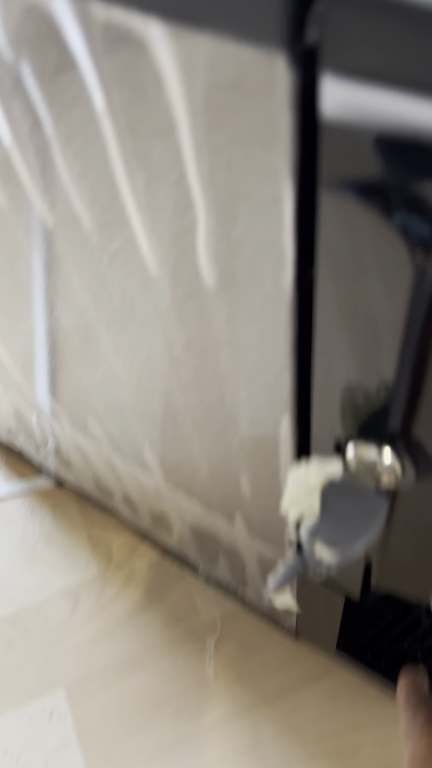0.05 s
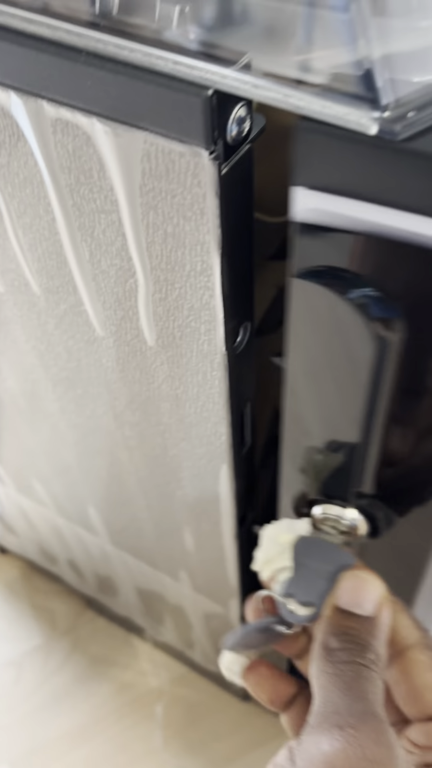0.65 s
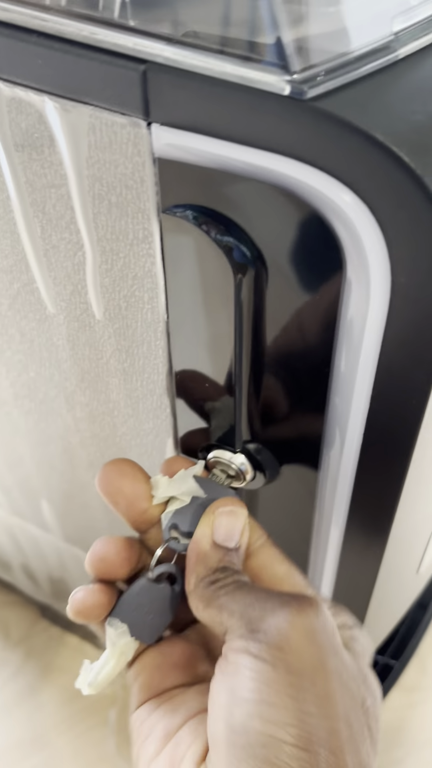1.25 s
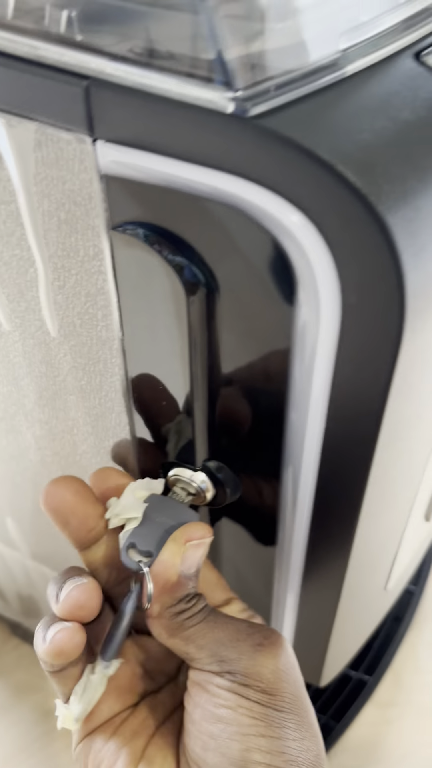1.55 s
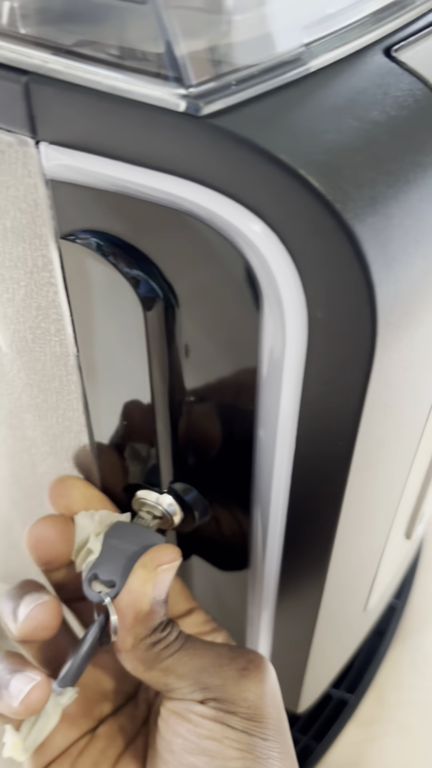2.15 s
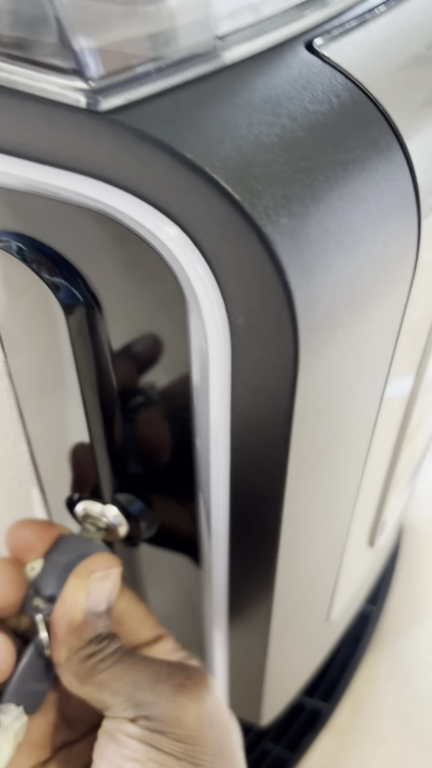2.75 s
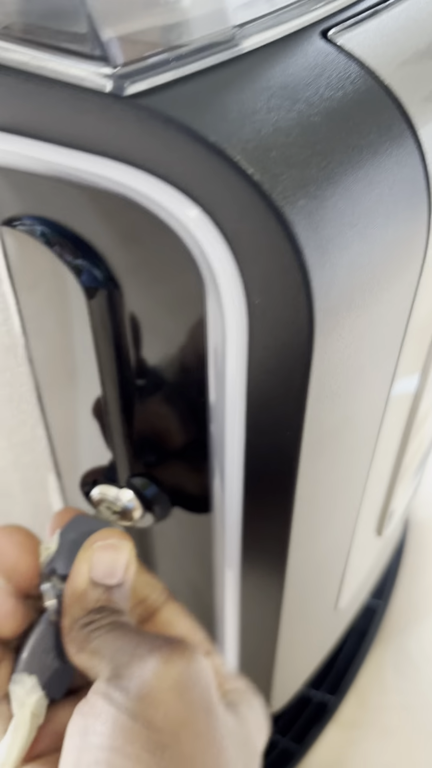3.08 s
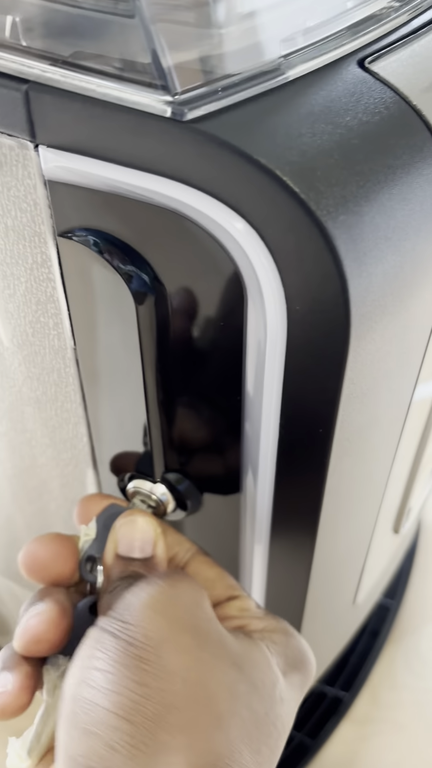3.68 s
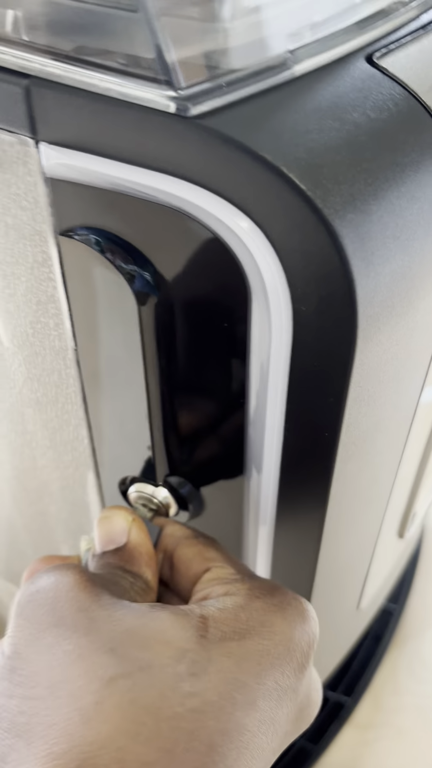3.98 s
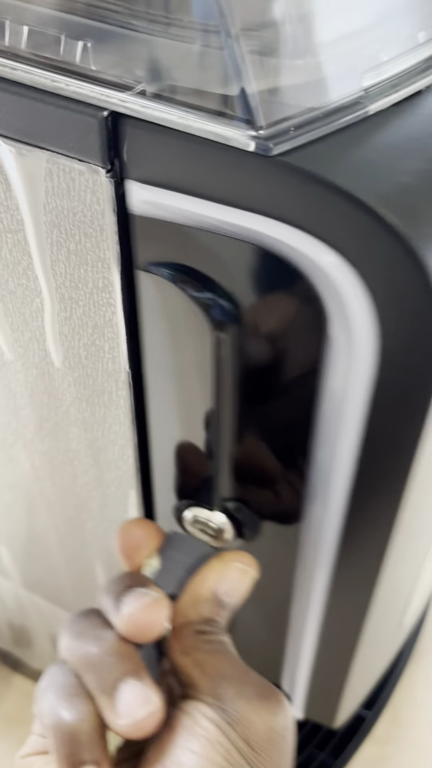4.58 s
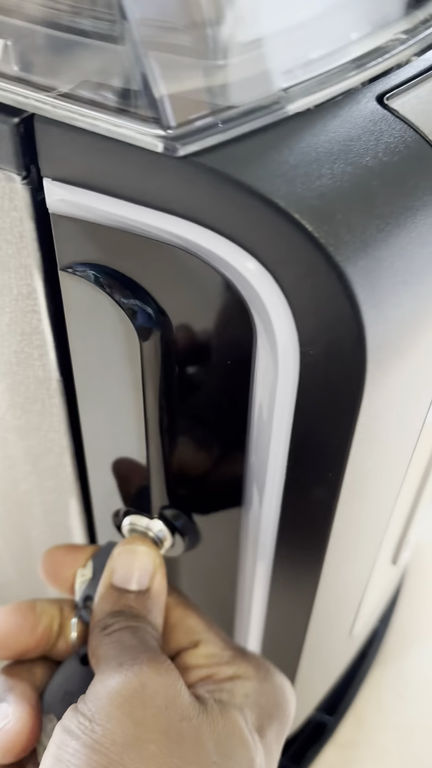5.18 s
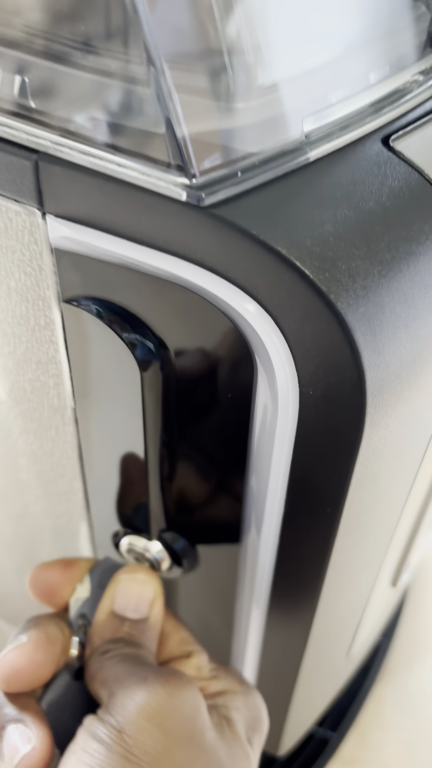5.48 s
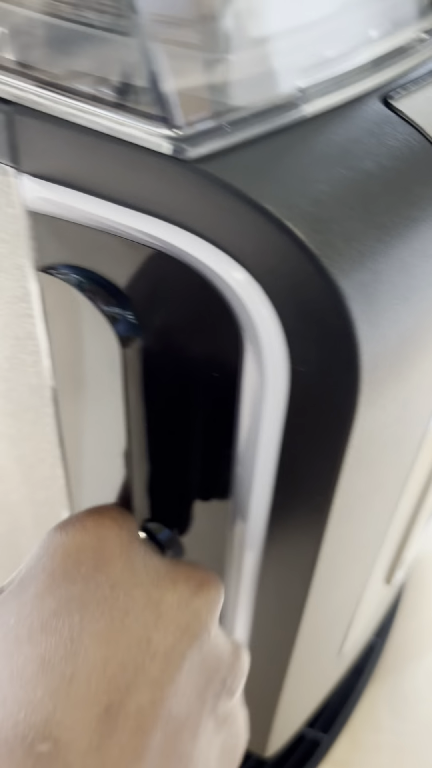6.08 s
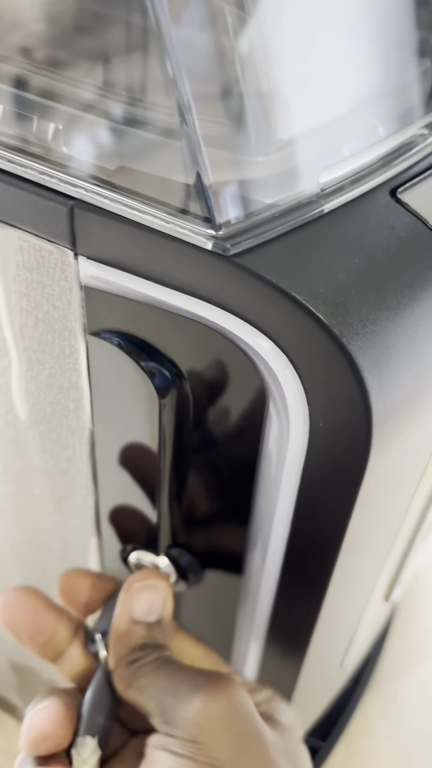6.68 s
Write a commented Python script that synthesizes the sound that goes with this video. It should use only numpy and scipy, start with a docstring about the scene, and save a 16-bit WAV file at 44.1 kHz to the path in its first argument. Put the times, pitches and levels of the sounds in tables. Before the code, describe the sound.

A hollow plastic and metal machine door is pushed shut, close by in a quiet room. Soft, dull bumps and light clacks fill the first second, with a firmer double knock at about 1 second. From 1.3 to 2 seconds a key and its ring tick sharply and scrape in the lock. A quieter stretch follows, with scattered small metal ticks, brief finger rubs and a light clack near 3.1 seconds. The key clicks again around 4.3 seconds. Between 4.5 and 4.8 seconds comes the loudest part: a short, low rub and heavy hollow thuds with latch clacks as the door is pressed home. Smaller knocks and clicks continue from 5.1 to 5.5 seconds, then a sharp key click and another thud near 6 seconds. Lighter lock clacks last until about 6.8 seconds. The knocks have a short reverberation over a faint low room rumble.

```python
"""Shutting and locking a machine door

A hollow plastic and metal door is pushed shut and locked, close to a phone in a quiet room.
Impacts on the frame excite the door's low modes; latch and cam clack through the lock housing,
and the key and its ring tick. Between the blows the held door flexes, and stick-slip friction
sounds under fingers and key. The small room adds a short reverberation."""
import sys
import numpy as np
from scipy import signal
from scipy.fft import rfft, irfft, next_fast_len
from scipy.io import wavfile
from scipy.ndimage import uniform_filter1d, map_coordinates

SR = 44100
rng = np.random.default_rng(int(sys.argv[2]) if len(sys.argv) > 2 else 0)


def transcribe(signal):
    """Save signal, clipped to [-1, 1], as a 16-bit WAV file at the path in sys.argv[1]."""
    frames = np.atleast_2d(signal).T
    limited = np.clip(frames, -1, 1)
    pcm = np.round(limited * 32767).astype(np.int16)
    wavfile.write(sys.argv[1], SR, pcm)


N = 301199


def amp(db):
    """Amplitude ratio of a level in decibels."""
    return 10 ** (np.asarray(db) / 20)


def unit(x):
    """Normalisation to rms 1."""
    return x / np.sqrt(np.mean(x ** 2) + 1e-20)


def struck(x, size=1100):
    """Normalisation of a blow to rms 1 over its first size samples."""
    return x / np.sqrt(np.mean(x[:size] ** 2) + 1e-20)


def along(points, hz):
    """Interpolation of (Hz, value) points on a logarithmic frequency axis."""
    f, v = np.transpose(points)
    return np.interp(np.log(hz + 1), np.log(f + 1), v)


def curve(points):
    """Linear interpolation of (seconds, value) points at every sample."""
    return np.interp(np.arange(N) / SR, *np.transpose(points))


def bell(hz, centre_hz, octaves):
    """A Gaussian hump in log frequency."""
    return np.exp(-(np.log2((hz + 1) / centre_hz) / octaves) ** 2)


def filtered(x, response):
    """Linear filtering: the spectrum of x times a complex frequency response."""
    n = x.shape[-1]
    m = next_fast_len(n + SR // 8)
    return irfft(rfft(x, m) * response(np.fft.rfftfreq(m, 1 / SR)), m)[..., :n]


def impulse(level_db, size=2048):
    """Minimum-phase impulse response of a dB curve, by folding the cepstrum."""
    cepstrum = irfft(np.log(amp(level_db(np.fft.rfftfreq(size, 1 / SR)))))
    cepstrum[1:size // 2] *= 2
    cepstrum[size // 2 + 1:] = 0
    return irfft(np.exp(rfft(cepstrum)))


def dying(t, t60):
    """Exponential decay by 60 dB in t60 seconds."""
    return np.exp(-np.log(1000) * t / t60)


def add(track, s, x):
    """Superposition of x on the track at s seconds."""
    part = track[max(round(s * SR), 0):][:len(x)]
    part += x[:len(part)]


def wobble(rate):
    """Smooth random modulation with rate knots a second."""
    knots = rng.standard_normal(int(N * rate / SR) + 4)
    return map_coordinates(knots, [np.arange(N) * rate / SR])


def noise(spectrum, channels=1):
    """Spectrally shaped noise of rms 1."""
    return unit(filtered(rng.standard_normal((channels, N)), lambda hz: amp(along(spectrum, hz))))


def roughness(t, spread_db, size):
    """Log-normal gain fluctuation, smoothed over size samples."""
    return amp(spread_db * unit(uniform_filter1d(rng.standard_normal(len(t)), size=size)))


def burst(t, rise, t60):
    """Contact chatter: uneven little impacts swell and decay as two surfaces meet."""
    impacts = roughness(t, spread_db=3, size=60)
    return rng.standard_normal(len(t)) * impacts * (1 - np.exp(-t / rise)) * dying(t, t60)


# The quiet room's noise. Each row: frequency in Hz, relative spectral density in dB.
AIR_SPECTRUM = [(22, -11), (45, -4.5), (65, 3.5), (110, -6), (200, -8), (400, -26.5), (1000, -40),
                (3000, -56.5), (9000, -47.5), (16000, -61)]


def air():
    """Ambient noise: a rumble common to both channels and a fainter, uncorrelated hiss."""
    return amp(-59.5) * noise(AIR_SPECTRUM) + amp(-84) * noise(RUB_SPECTRUM, channels=2)


# The room's decay. Each row: frequency in Hz, reverberation time (t60) in seconds.
ROOM_DECAY = [(100, 0.87), (400, 0.44), (1500, 0.38), (5000, 0.29), (9000, 0.19), (15000, 0.22)]


def room(x, spread, rise_s=0.001, block=16384):
    """Diffuse reverberation: each band dies at its own rate, and the tail changes as the phone moves."""
    out = np.zeros((2, N))
    hz, t = np.fft.rfftfreq(256, 1 / SR), np.arange(200) * 128 / SR
    decay = dying(t, along(ROOM_DECAY, hz)[:, None])
    for start in range(0, N, block):
        real, imaginary = rng.standard_normal((2, 2) + decay.shape)
        tails = signal.istft((real + 1j * imaginary) * decay, SR)[1]
        tails *= 1 - np.exp(-np.arange(tails.shape[1]) / SR / rise_s)
        tails /= np.linalg.norm(tails[0])
        mid, side = signal.fftconvolve(x[None, start:start + block], tails, axes=1)
        add(out[0], start / SR, mid + spread * side)
        add(out[1], start / SR, mid - spread * side)
    return out


# Flexing door, rubbing fingers and key metal. Each row: frequency in Hz, relative density in dB.
FLEX_SPECTRUM = [(25, -21), (50, 4), (68, -7), (110, 1.5), (180, -4), (240, -5.5), (400, -8.5), (700, -22),
                 (1500, -64)]
RUB_SPECTRUM = [(250, -37.5), (520, 5.5), (950, -1), (1400, -4.5), (2000, -6.5), (2800, -10.5),
                (4500, -16.5), (8000, -31)]
KEY_SPECTRUM = [(600, -28.5), (2600, -24), (4000, -4.5), (5000, -5.5), (7000, -6), (9200, -6.5),
                (11000, -11.5), (14300, -7.5), (16500, -9)]
# The hand's pressure on the door. Each row: time in seconds, relative flexing level in dB.
HAND_PRESSURE = [(0.0, -43), (1.29, -49), (1.86, -53.5), (2.04, -66), (3.31, -55), (3.96, -62.5),
                 (4.58, -51.5), (4.7, -35.5), (5.0, -47.5), (5.34, -38), (5.53, -46), (5.76, -51),
                 (6.01, -40.5), (6.2, -55), (6.6, -44.5), (6.83, -50.5)]
# The key working in the lock. Each row: time in seconds, relative scraping level in dB.
KEY_MOTION = [(0, -67.5), (.6, -59), (1.0, -56.5), (1.2, -69), (1.55, -53.5), (1.83, -67), (2.15, -69),
              (2.8, -75.5), (3.05, -60.5), (3.3, -73.5), (3.9, -92), (4.4, -66.5), (4.7, -66), (5.1, -73),
              (5.6, -91), (5.95, -53), (6.27, -97), (6.45, -62.5), (6.83, -62)]


def hand(flex_db=-4, rub_db=-8, scrape_db=-3, grip_db=-36.5, swing_db=4.5, grain_db=6):
    """Stick-slip friction: fingers and key catch and slide in uneven grains while the held door flexes."""
    flex, scrape = curve(HAND_PRESSURE), curve(KEY_MOTION)
    rub = grip_db + 1.34 * (flex - grip_db)  # rubbing grows faster with pressure than flexing
    slips = wobble(45)
    flexing = unit(noise(FLEX_SPECTRUM)[0] * amp(swing_db * wobble(39)))
    rubbing = unit(noise(RUB_SPECTRUM)[0] * amp(5.9 * slips))
    scraping = unit(noise(KEY_SPECTRUM)[0] * amp(1.8 * slips + grain_db * wobble(1000)))
    return amp(flex + flex_db) * flexing + amp(rub + rub_db) * rubbing + amp(scrape + scrape_db) * scraping


# The key slides in the lock, and fingers slide on plastic.
# Each row: midpoint in seconds, half length in seconds, level in dB, centre frequency in Hz.
STROKES = [(1.764, 0.0072, -51.5, 4200), (1.901, 0.012, -44.5, 6800), (2.24, 0.012, -53.5, 4860),
           (2.587, 0.019, -63, 2580), (2.722, 0.0087, -64.5, 1160), (2.436, 0.0087, -65, 8760),
           (2.845, 0.013, -63, 2070), (2.889, 0.014, -60.5, 656), (3.033, 0.016, -67.5, 1800),
           (3.116, 0.015, -45, 700), (3.437, 0.037, -73, 984), (3.962, 0.013, -63, 895),
           (4.199, .014, -51, 600), (4.606, .021, -23.5, 365), (6.111, 0.0082, -45, 775)]


def slides(octaves=1.67, focus_db=22):
    """Sliding friction: each stroke is a band of grainy noise under a Gaussian envelope."""
    out, t = np.zeros(N), np.arange(-SR // 10, SR // 10) / SR
    for s, half, db, centre_hz in STROKES:
        def band(hz):
            return amp(focus_db * bell(hz, centre_hz, octaves)) / (1 + hz / centre_hz / 2)
        grains = rng.standard_normal(len(t)) * roughness(t, spread_db=2.5, size=70)
        swell = np.exp(-(t / half) ** 2 / 2)
        add(out, s + t[0], amp(db) * unit(filtered(grains, band)) * swell)
    return out


def jingles(count=96, per_second=17, above_scrape_db=21, spread_db=4.5, ring_hz=7400, octaves=0.35):
    """Random collisions of the dangling key ring: rows of faint ticks that follow the key's motion."""
    late, strength, pitch = rng.standard_normal((count, 3)).T
    s = np.abs(np.arange(count) + late) / per_second
    db = np.interp(s, *np.transpose(KEY_MOTION)) + above_scrape_db + spread_db * strength
    return list(zip(s, db, ring_hz * 2 ** (octaves * pitch)))


# Key, pins and key ring touch. Each row: time in seconds, relative level in dB, ring frequency in Hz.
KEY_TICKS = [(0.573, -33, 4930), (0.8653, -25.5, 5240), (1.054, -22.5, 5230), (1.1217, -23, 6330),
             (1.275, -26.5, 13000), (1.2993, -28.5, 6950), (1.305, -12, 7300), (1.3207, -15.5, 7930),
             (1.3493, -12.5, 7870), (1.5133, -3.5, 7440), (1.6604, -29.5, 14200), (1.7556, -30, 4100),
             (1.9046, -33, 7140), (1.915, -28.5, 14000), (1.933, -8.5, 11400), (2.039, -36.5, 4900),
             (2.303, -20.5, 4500), (2.5492, -36, 6940), (2.576, -35.5, 7510), (2.8926, -15, 7260),
             (2.9329, -20.5, 7900), (3.088, -25.5, 4040), (3.1367, -17, 8200), (3.6116, -31, 8900),
             (3.954, -47, 7500), (4.0178, -48, 11900), (4.27, -26, 7240), (4.28, -36, 8410),
             (4.287, -19.5, 5300), (4.3113, -30, 12900), (4.3163, -9, 8000), (4.437, -28.5, 4000),
             (4.5231, -7, 7630), (4.7248, -18.5, 5240), (4.9659, -24.5, 6460), (5.139, -27.5, 4930),
             (5.2252, -29.5, 4940), (5.456, -35.5, 4940), (5.7057, -32.5, 14800), (5.8415, -5, 8240),
             (6.35, -18.5, 8660), (6.7012, -27.5, 4470), (6.7726, -23.5, 9250)]


def key(tick_db=-1, focus_db=7, octaves=0.55, ring_db=-24, ring_t60=0.021, delay_s=0.0019):
    """Impact and free vibration: small metal parts tick, each around its own pitch, and ring faintly."""
    out, t = np.zeros(N), np.arange(SR // 20) / SR
    for s, db, ring_hz in KEY_TICKS + jingles():
        metal = impulse(lambda hz: along(KEY_SPECTRUM, hz) + focus_db * bell(hz, ring_hz, octaves))
        tick = signal.fftconvolve(burst(t, rise=0.0006, t60=0.0042), metal)[:len(t)]
        ring = amp(ring_db) * np.sin(2 * np.pi * ring_hz * t) * dying(t, ring_t60)
        add(out, s + delay_s, amp(db + tick_db) * (tick / np.abs(tick).max() + ring))
    return out


# The lock housing's resonances. Each row: frequency in Hz, bandwidth in Hz, relative level in dB.
HOUSING_MODES = [(519, 67, 5.5), (670, 38, -8.5), (746, 84, -4), (835, 30, -1), (975, 75, 11),
                 (1090, 120, 0.5), (1332, 190, 0.5), (1634, 60, -0.5), (1932, 150, -2.5), (2230, 310, -6.5),
                 (2760, 340, -7.5), (3550, 140, -20.5), (3690, 27, -12)]
# The metal cam's bright snap. Each row: frequency in Hz, relative spectral density in dB.
CAM_SPECTRUM = [(2200, -22.5), (3500, 2), (5000, 5.5), (7000, -4), (7900, -2), (8330, -1.5), (8800, -3.5),
                (10500, -17), (14000, -8.5), (16500, -25)]
# Latch, cam and plastic edges strike.
# Each row: start in seconds, chatter t60 in seconds, relative level in dB, hardness in dB.
LATCH_CLACKS = [(0.037, 0.14, -38, -18), (0.286, 0.49, -44, -14), (0.387, 0.029, -29, 1.5),
                (0.519, 0.44, -44.5, -24), (0.797, 0.027, -36, 0), (0.994, 0.1, -28.5, -25.5),
                (1.052, 0.11, -30.5, -9.5), (1.398, 0.028, -50, -22), (1.514, 0.038, -48, 0.5),
                (1.664, 0.029, -42.5, -4), (1.705, 0.06, -56, 13.5), (1.934, 0.015, -53.5, 11),
                (2.299, 0.16, -52.5, 2), (3.067, 0.18, -53, 6), (3.137, .04, -36, 5.5),
                (3.611, 0.056, -48.5, 1), (4.021, 0.081, -54.5, -12), (4.216, 0.044, -40, -6.5),
                (4.316, 0.0083, -47.5, -0.5), (4.524, 0.05, -30.5, -1), (4.584, 0.2, -32, 0.5),
                (4.715, 0.28, -39.5, 1.5), (4.74, 0.096, -28, -1.5), (4.753, 0.034, -18, -41),
                (4.769, 0.059, -28.5, -2), (5.123, 0.1, -52, 4), (5.139, 0.057, -43, 5),
                (5.172, .029, -33.5, -4.5), (5.238, 0.027, -45, 0), (5.275, 0.1, -37, -31),
                (5.308, 0.054, -38.5, -9), (5.328, 0.027, -40.5, 2.5), (5.384, .025, -44.5, -17),
                (5.753, 0.071, -43.5, -34), (5.842, 0.026, -31.5, -0.5), (5.933, 0.058, -44.5, 5.5),
                (5.979, 0.04, -36.5, -5.5), (6.048, 0.051, -43, 1), (6.35, 0.039, -31, -14.5),
                (6.487, 0.14, -42.5, -3.5), (6.595, 0.022, -37, 6.5), (6.678, 0.14, -51, 2)]


def latch(knock_db=-1, clack_db=-6, crack_db=-5, snap_db=-7, detune=0.024, bounce_s=0.007, bounce_db=-13):
    """Impact excitation: chatter drives housing and cam; harder contacts favour higher resonances."""
    out, t = np.zeros(N), np.arange(SR // 5) / SR
    hz, width, mode_db = np.transpose(HOUSING_MODES)[..., None]
    cam = impulse(lambda f: along(CAM_SPECTRUM, f))
    for s, chatter, level, hardness in LATCH_CLACKS:
        levels = level + hardness * np.array([0, 0.17, 0.97, 1]) + [knock_db, clack_db, crack_db, snap_db]
        # each spot on the lock rings with slightly different pitches and signs
        shift, sign = rng.standard_normal((2, len(HOUSING_MODES), 1))
        envelopes = np.sign(sign) * amp(mode_db) * width * np.exp(-np.pi * width * t)
        modes = envelopes * np.sin(2 * np.pi * hz * (1 + detune * shift) * t)
        knock, clack, crack = [np.diff(group.sum(0)) for group in np.split(modes, [3, 7])]
        for body, db in zip([knock, clack, crack, cam], levels):
            push = burst(t, rise=0.012 * chatter, t60=chatter)  # a longer crunch starts more softly
            push[0] = 5  # the first contact stands out most in a short clack
            add(push, bounce_s * rng.uniform(0.7, 1.3), amp(bounce_db) * push)  # one rebound
            add(out, s, amp(db) * struck(signal.fftconvolve(push, body)[:len(t)]))
    return out


# The hollow door's resonances. Each row: frequency in Hz, relative level in dB, t60 in seconds.
DOOR_MODES = [(75.7, -2.5, 0.28), (99.4, 0, 0.18), (119.3, -5.5, 0.15), (143.2, 0, .15),
              (162.7, -0.5, 0.21), (183.4, 2.5, 0.12), (229.6, -12, 0.26), (281.5, 2.5, 0.12),
              (318.5, 0, 0.19), (371.3, 1, 0.12), (449.2, -0.5, 0.12), (484, -10.5, 0.27)]
# The door meets its frame. Each row: start in seconds, relative level in dB, nearness to the edge in dB.
DOOR_THUDS = [(0.002, -39, 2), (0.04, -42, -3.5), (0.112, -36, -26), (0.302, -31, -2), (0.388, -40, 2.5),
              (0.46, -39, -4), (0.539, -37.5, -5), (0.75, -38, -2.5), (0.995, -28.5, 5),
              (1.052, -29.5, 9.5), (1.101, -32, -4.5), (1.514, -42, -2.5), (1.659, -47, 4.5),
              (1.936, -52.5, 0), (3.075, -38, -6), (3.122, -42.5, 4.5), (4.209, -40.5, 1), (4.527, -33, 1),
              (4.583, -24, 4), (4.604, -20.5, -2.5), (4.755, -22.5, 6), (5.122, -33, 0.5),
              (5.164, -36, 5.5), (5.28, -32, -1.5), (5.345, -34.5, -5.5), (5.481, -37.5, 0.5),
              (5.722, -40, -1), (5.841, -29, -8), (5.984, -23.5, -5), (6.351, -41, 3.5), (6.486, -30, -3.5)]


def door(sway_db=-9, panel_db=0, shell_db=-7, rattle=0.045, detune=0.023, swell_s=0.0042):
    """Modal superposition: the struck door sways as a whole, its panels drum and its shell knocks."""
    out, t = np.zeros(N), np.arange(SR // 2) / SR
    hz, mode_db, t60 = np.transpose(DOOR_MODES)[..., None]
    swell = 1 - np.exp(-t / swell_s)
    for s, level, edge in DOOR_THUDS:
        # a blow near the edge excites sway and shell more than the panels
        levels = level + edge * np.array([1.2, 0, 0.76]) + [sway_db, panel_db, shell_db]
        push = rattle * burst(t, rise=0.003, t60=0.04)
        push[0] = 1
        # grip and point of contact shift each mode's pitch, strength and sign
        shift, strength, sign = rng.standard_normal((3, len(DOOR_MODES), 1))
        envelopes = np.sign(sign) * amp(mode_db + 2 * strength) * dying(t, t60)
        modes = envelopes * np.sin(2 * np.pi * hz * (1 + detune * shift) * t)
        for group, db in zip(np.split(modes, [2, 7]), levels):  # sway, panels, shell
            ring = signal.fftconvolve(push, group.sum(0))[:len(t)] * swell
            add(out, s, amp(db) * struck(ring, size=1500))
    return out


def scene():
    """Superposition of the direct sound, its reverberation and the ambient noise."""
    thuds, clacks, ticks = door(), latch() + slides(), key()
    echo = amp(-8.5) * room(thuds, spread=0.09)
    echo += amp(-11.5) * room(clacks, spread=0.58)
    echo += amp(-15) * room(ticks, spread=0.28)
    return air() + echo + hand() + ticks + clacks + thuds


# The microphones' colour. Each row: frequency in Hz, gain in dB.
MIC_RESPONSE = [(800, 0), (1250, -1.5), (1900, 2), (3500, 0), (4400, -1.5), (5500, 1), (6700, 1.5),
                (7800, -2), (8400, 0.5), (10300, 0.5), (12000, 2), (15000, -2)]
# Phase between the channels. Each row: frequency in Hz, lead of the left in radians.
CHANNEL_PHASE = [(100, 0), (300, -.2), (560, -.9), (900, -.15), (1450, -.2), (2100, 1), (2800, 2.7),
                 (3800, 1.1), (4570, 2.1), (5000, 1), (5650, 3.1), (8100, 6.2), (10900, 9.4), (13500, 12.5),
                 (16000, 15.5)]
# Balance between the channels. Each row: frequency in Hz, left minus right level in dB.
CHANNEL_BALANCE = [(380, 0), (620, -3.8), (1300, -2), (2000, -.7), (3200, -3), (5000, -1), (8000, 0)]


def record(dry, low_hz=45, top_hz=15950):
    """The phone's transfer function: band-limited and coloured, its channels unequal in phase and level."""
    def microphones(hz):
        lead = np.exp(1j * along(CHANNEL_PHASE, hz) / 2)
        tilt = amp(along(CHANNEL_BALANCE, hz) / 2)
        return amp(along(MIC_RESPONSE, hz)) * np.array([lead * tilt, 1 / (lead * tilt)])
    bass_cut = signal.sosfilt(signal.butter(2, low_hz, "highpass", fs=SR, output="sos"), dry)
    coloured = filtered(bass_cut, microphones)
    return filtered(coloured, lambda hz: 1 / np.sqrt(1 + (hz / top_hz) ** 100))


dry = scene()
out = record(dry)
transcribe(out)
```